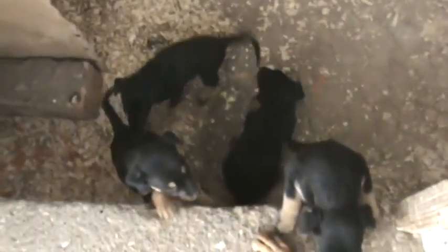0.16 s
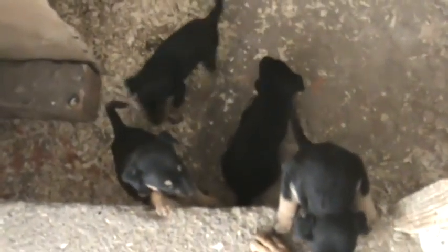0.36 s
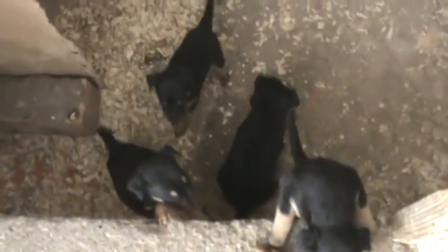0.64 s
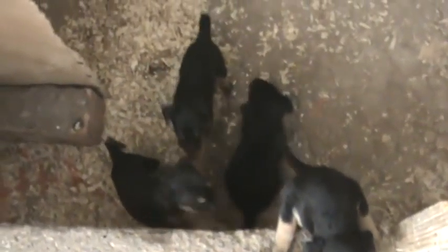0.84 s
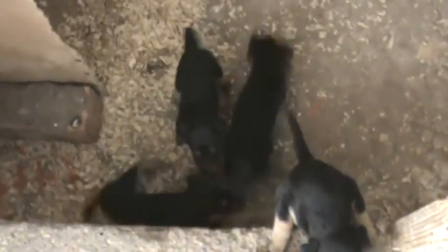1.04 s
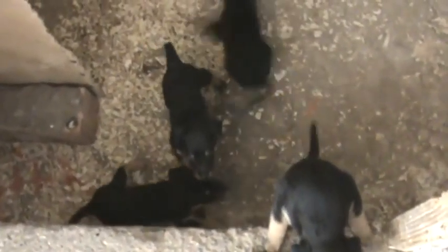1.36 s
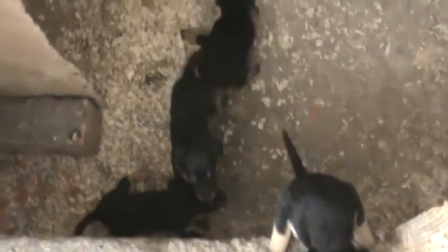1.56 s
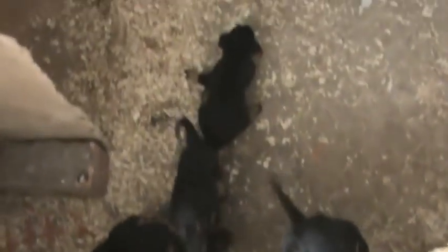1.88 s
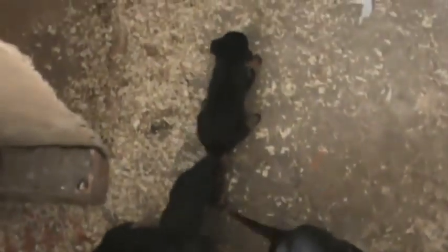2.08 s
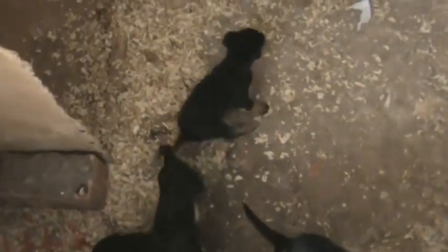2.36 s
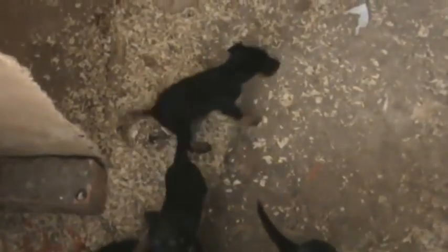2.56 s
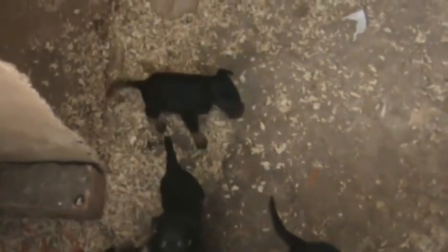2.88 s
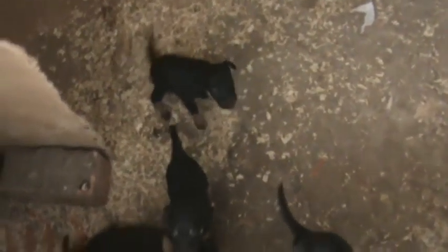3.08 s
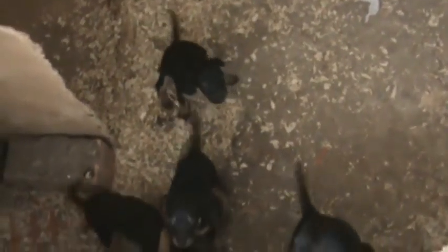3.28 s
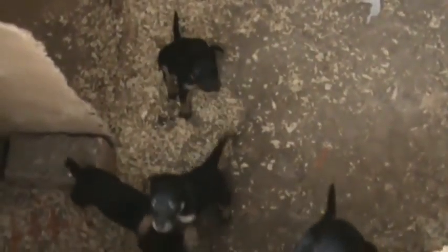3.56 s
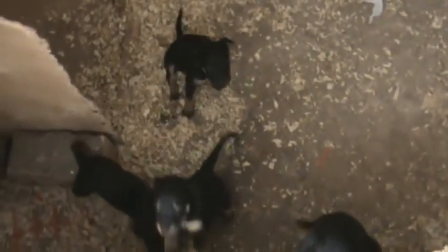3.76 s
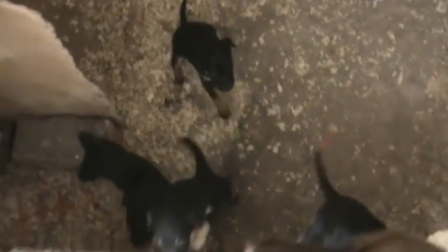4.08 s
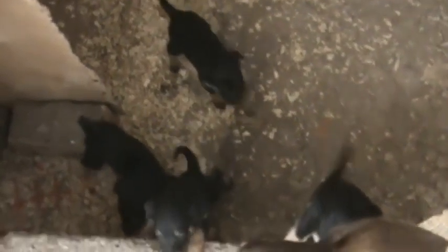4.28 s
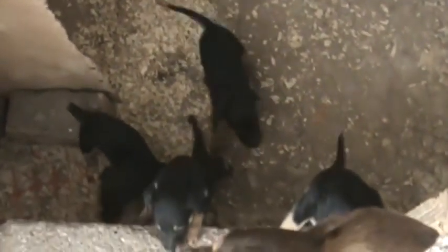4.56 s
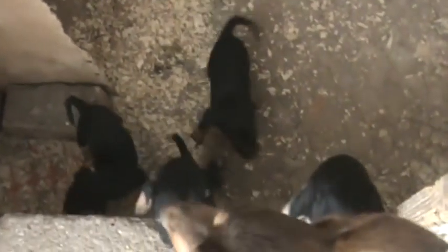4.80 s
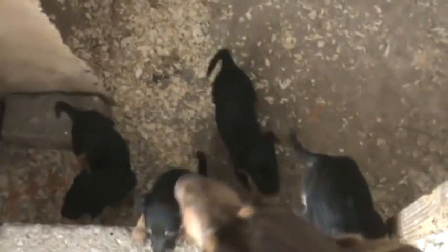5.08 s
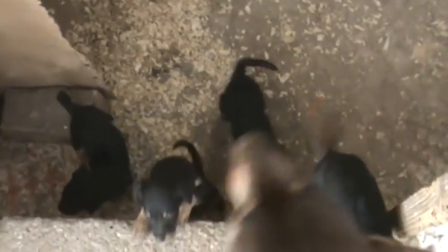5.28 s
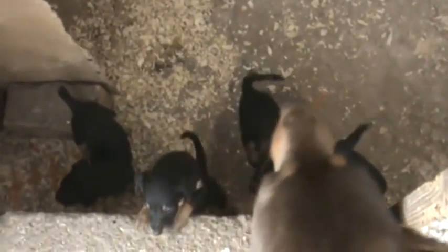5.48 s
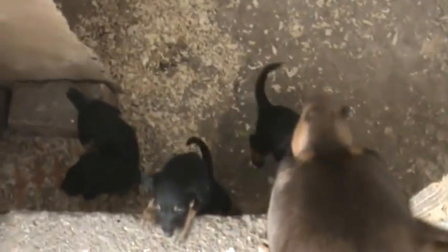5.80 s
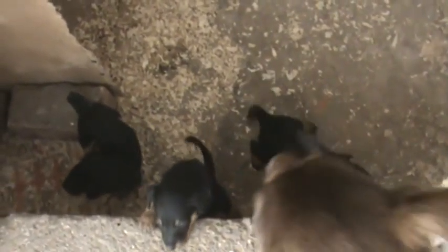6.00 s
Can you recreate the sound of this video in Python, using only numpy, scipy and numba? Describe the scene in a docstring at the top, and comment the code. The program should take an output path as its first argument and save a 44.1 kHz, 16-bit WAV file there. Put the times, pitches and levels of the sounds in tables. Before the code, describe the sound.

Close to a stereo microphone, puppies yelp briefly, smack their lips and grunt while their paws tick on concrete and rustle faintly in wood shavings. Midway the crying peaks with a piercing yelp and a strained, high wail, trailed by a wavering, falling whine. The puppies then settle into tiny whimpers and soft grunts. The pen has a short echo and quiet air with a faint low hum.

```python
"""Puppies in a concrete pen.

Close under a camera's stereo microphone, puppies yelp, whimper, wail and grunt; strain roughens
their voices. Wet lips smack in between, claws tick, and paws rustle and scuff in wood shavings.
The hard walls ring briefly over quiet air and a low hum. A limiter holds down the loudest cries."""
import sys
import numpy as np
from scipy import signal
from scipy.fft import rfft, irfft, next_fast_len
from scipy.io import wavfile
from scipy.ndimage import uniform_filter1d, minimum_filter1d, map_coordinates
from numba import njit

SR = 44100
rng = np.random.default_rng(int(sys.argv[2]) if len(sys.argv) > 2 else 0)


def log_audio(samples):
    """Write samples as a 16-bit WAV file to the path given in sys.argv[1]."""
    # one column per channel
    frames = np.atleast_2d(samples).T
    # limit to full scale, then quantise
    limited = np.clip(frames, -1, 1)
    pcm = np.round(limited * 32767).astype(np.int16)
    wavfile.write(sys.argv[1], SR, pcm)


N = 270774

# Short cries: open-mouthed yelps, nasal whimpers. Each row: start, rise, hold and fall in seconds,
# first, top and last pitch in Hz before the sag, level in dB, octave and overtones in dB against
# that level, roughness from 0 to 1, left over right in dB.
YELPS = [(0, 0.0014, 0.019, 0.027, 970, 981, 973, -36.5, 0.5, -11, 0.71, 2.5),
         (0.216, 0.053, 0.011, 0.11, 1015, 1418, 976.4, -22.5, 4, -1.5, 0.31, 1.7),
         (0.709, 0.013, 0.022, 0.0137, 567, 797.2, 764, -25.5, -7.5, -13, 0.43, 1),
         (2.348, .1, .048, 0.025, 1358, 2219, 1710, -18, -1.5, -5, 0.4, .7)]
WHIMPERS = [(2.021, 0.07, 0.0098, 0.052, 824.5, 1122, 950, -34, -5.5, -21, 0.33, 1),
            (3.95, 0.095, 0.049, 0.1, 513, 590, 615, -61, -8, -34, 0.11, -2),
            (4.681, .08, .08, 0.18, 528, 498, 517, -59.5, -10, -44.5, 0.31, -1),
            (5.149, 0.011, 0.011, 0.016, 940, 932, 930, -44.5, -13, -19.5, 1, 4)]
# Pitch of the two long cries, a high wail and a softer whine. Each row: time in seconds, pitch in Hz.
WAIL_PITCH = [(2.73, 1695), (2.75, 1663), (2.778, 1732), (2.79, 2082), (2.812, 2210), (2.876, 2111),
              (2.912, 2091), (2.98, 2084), (3.046, 1925), (3.25, 1810), (3.288, 1719), (3.358, 1716),
              (3.42, 1580), (3.5, 1583)]
WHINE_PITCH = [(3.662, 1131), (3.71, 1560), (3.736, 1708), (3.828, 1426), (3.95, 1559), (4.098, 1365),
               (4.184, 1409), (4.298, 1308), (4.4, 1068), (4.432, 792), (4.476, 778), (4.51, 730)]
# Their loudness. Each row: time in seconds, relative levels of fundamental and octave in dB.
WAIL_LEVEL = [(2.728, -38, -43), (2.752, -13.5, -24.5), (2.778, -20, -9.5), (2.876, -10.5, -26.5),
              (3.032, -18.5, -30), (3.088, -27.5, -54), (3.104, -18.5, -52.5), (3.264, -42, -50.5),
              (3.378, -36.5, -48), (3.5, -39.5, -58)]
WHINE_LEVEL = [(3.662, -39.5, -50.5), (3.706, -25.5, -29.5), (3.86, -41.5, -55.5), (4.132, -33.5, -54.5),
               (4.154, -50.5, -34.5), (4.238, -33.5, -41.5), (4.354, -44.5, -48), (4.37, -34.5, -48.5),
               (4.51, -36.5, -70)]
# Colours of the voice. Each row: frequency in Hz, gain in dB.
OPEN_MOUTH = [(1500, 17), (2400, 8), (2850, -20), (3350, -15), (4200, 1), (4750, 1.5), (5600, 3.5),
              (6300, -4), (7100, -8.5), (8000, -13.5), (10500, -27.5), (15000, -44.5)]
NOSE = [(1500, 7), (2400, -6.5), (3300, -6), (4200, 0.5), (5000, 0), (6400, 6.5), (7200, 6), (8300, -4),
        (10500, -18.5), (12000, -44), (15000, -25)]  # mouth nearly shut
SHRILL_THROAT = [(3300, -11), (4700, -0.5), (5200, -3), (5800, -2), (6500, 8), (7100, 1), (7700, -14),
                 (9000, -11.5), (10500, -24), (11200, -16.5), (12100, -16), (12700, -34.5), (15000, -44)]  # the wail, with one sharp resonance
LOW_FORMANTS = [(500, -2.5), (800, -1.5), (950, -3.5), (1150, -15), (1400, -11.5), (1700, 2), (2250, 0),
                (2800, -3), (3000, -24.5), (3400, -7.5), (3750, -9.5), (4200, -1), (4600, -8.5)]  # the throat, on a short cry's two lowest harmonics
MUZZLE = [(150, -16), (300, -2.5), (450, -9), (660, -2.5), (850, -3.5), (1050, -4.5), (1300, -10.5),
          (1750, -3), (2400, -23), (3100, -22), (4300, -9), (8000, -47)]  # closed, for grunts
# Grunts. Each row: start in seconds, level in dB, length in seconds, pitch in Hz.
GRUNTS = [(.89, -54.5, 0.084, 433), (1.079, -42, 0.045, 300.5), (1.353, -29, .11, 327.2),
          (2.105, -42, .07, 320.2), (4.474, -47, 0.065, 422.5), (4.903, -46, 0.045, 273.6),
          (5.618, -48.5, 0.048, 247.3), (5.832, -47.5, 0.022, 352), (6.035, -51.5, 0.03, 313)]
# Wet smacks. Each row: start in seconds, level in dB, length in seconds, first flutter rate in Hz,
# first mouth resonance in Hz, last frequency of both in Hz, fade in dB, jitter from 0 to 1.
SMACKS = [(1.027, -28, .025, 2423, 2700, 1820, -2.5, 0.07), (1.05, -33.5, 0.037, 1713, 1799, 585, 2, 0.37),
          (1.221, -25, .023, 1680, 3750, 1077, -6.5, .28), (1.52, -36.5, 0.019, 1382, 1512, 843, 10, .11),
          (1.546, -30, 0.014, 855, 1350, 554, -1, .4), (1.999, -39.5, .022, 1391, 2840, 860, -8, 0.26),
          (2.268, -25.5, .025, 970, 2480, 759, -11, .31), (2.559, -29.5, 0.03, 1304, 1603, 603, -5.5, .4),
          (2.845, -39, 0.032, 1092, 1400, 546, -1.5, 0.39)]
# Claws on the floor. Each row: start in seconds, level in dB.
TICKS = [(1.075, -25.5), (1.542, -27.5), (1.5524, -24), (1.6374, -56), (2.6969, -30.5), (2.787, -40),
         (2.828, -30), (3.576, -45), (4.4327, -36), (4.9955, -49.5), (5.1018, -46)]
# Paws shuffling through the shavings. Each row: start and length in seconds, level in dB.
SHUFFLES = [(0, 0.12, -58), (0.531, 0.044, -53), (1.291, 0.26, -45.5), (1.877, 0.52, -59),
            (2.468, .4, -53.5)]
# The steady rustle under them. Each row: time in seconds, level in dB.
RUSTLE_LEVEL = [(0, -61), (3.3, -56.5), (3.7, -65.5), (4.1, -59.5), (4.649, -63), (5.7, -73), (6.14, -67.5)]
# Soft scuffs. Each row: start and length in seconds, level in dB, first and last centre in Hz.
SCUFFS = [(0.893, 0.38, -64, 4500, 3900), (5.13, 0.43, -63.5, 4870, 3600), (5.863, 0.22, -65, 5700, 4350)]
# Colours of the noisy sounds. Each row: frequency in Hz, relative spectral density in dB.
RASP_COLOUR = [(250, -29), (450, 13), (700, -5.5), (1000, -5), (1300, -45.5), (1750, 2.5), (2900, -4.5),
               (4300, -16.5), (7000, -4), (15500, -26)]
LIP_COLOUR = [(170, -47.5), (300, -5.5), (853, -7.5), (2590, -6.5), (3160, -16), (3550, -4.5),
              (3920, -18.5), (4550, -10.5), (7370, -11), (11700, -18.5), (15800, -35.5)]
CLAW_COLOUR = [(70, -45.5), (140, -24), (400, -17.5), (900, 7.5), (3000, -4.5), (7000, -8.5), (11000, -16),
               (16000, -24)]
SHAVINGS_COLOUR = [(200, 0.5), (500, -13), (1600, 5), (3300, 0.5), (7400, 2), (11000, -3.5), (15800, -16)]
AIR_COLOUR = [(20, -15), (48, -8), (90, -14.5), (280, -13.5), (500, -15.5), (1100, -21.5), (1600, -19),
              (2200, -27.5), (3800, -24.5), (8000, -34), (15800, -37.5)]
# Low hum. Each row: frequency in Hz, level in dB.
HUM = [(43.1, -59)]
# Ring of the pen. Each row: frequency in Hz, seconds to die away by 60 dB.
PEN_T60 = [(200, 0.72), (800, 0.31), (2000, 0.33), (5000, 0.29), (9000, 0.33), (15000, 0.09)]
# Width at the microphone's two ports. Each row: frequency in Hz, difference over sum in dB.
PORT_WIDTH = [(50, -17.5), (150, -16), (500, -3), (1200, -4.5), (2100, -8.5), (3500, -9.5), (8000, -14.5),
              (13000, -6.5)]

TOP_HZ = 15950
TIRED_ROUGH = .44  # roughness gained as a cry ends


def cries():
    """The puppies' voices from down in the pen: yelps, whimpers, a wail and a whine."""
    yelps = sum(short_cry(row, OPEN_MOUTH) for row in YELPS)
    whimpers = sum(short_cry(row, NOSE) for row in WHIMPERS)
    wail = long_cry(WAIL_PITCH, WAIL_LEVEL, SHRILL_THROAT, db=1, octave_db=1, overtone_db=-49,
                    strain_s=.078, strain_db=26, drop=.17, left_db=-.7)
    whine = long_cry(WHINE_PITCH, WHINE_LEVEL, NOSE, db=-1, octave_db=-5.5, overtone_db=-54.5,
                     strain_s=.11, strain_db=10.5, drop=.051, left_db=1.2)
    return low_cut(yelps + whimpers + wail + whine, 400)


def short_cry(row, throat, swell_s=.02, swell_db=9.5, fade_db=7.5, drop_share=.3, sag=.13):
    """One arch of pitch: the voice is cleanest at the top and dulls as the breath runs out."""
    start, rise, hold, fall, first_hz, top_hz, last_hz, db, octave_db, overtone_db, rough, left_db = row
    length = rise + hold + fall
    t = np.arange(int(length * SR)) / SR
    fallen = np.maximum(t - rise - hold, 0) / fall
    rising = first_hz + (top_hz - first_hz) * np.sin(np.pi / 2 * t / rise)
    falling = last_hz + (top_hz - last_hz) * np.exp(-(fallen / drop_share) ** 2)
    pitch = np.where(t < rise, rising, falling) * (1 - sag * fallen)
    slack_octaves = np.abs(np.log2(top_hz / pitch))
    # a cry at time zero is already under way
    level = db - swell_db * np.maximum(1 - t / swell_s, 0) * (start > 0) - fade_db * fallen
    fundamental = level + along(LOW_FORMANTS, pitch)
    octave = level + octave_db + along(LOW_FORMANTS, 2 * pitch)
    overtones = level + overtone_db - 2 * slack_octaves - 6.5 * t / length
    rough = rough + .65 * slack_octaves + TIRED_ROUGH * fallen
    wavering = pitch * (1 + .016 * wobble(70, len(t)))
    return vocal_folds(start + t, wavering, fundamental, octave, overtones, rough, throat, left_db)


def long_cry(pitches, levels, throat, db, octave_db, overtone_db, strain_s, strain_db, drop, left_db,
             relax_s=.004, catch_s=.028, break_hz=1392):
    """A strained, bright start relaxes into a clear tone, which breaks up wherever it sinks low."""
    t = np.arange(pitches[0][0] - .003, pitches[-1][0] + .005, 1 / SR)
    times, *columns = np.transpose(levels)
    level, octave = [np.interp(t, times, column) for column in columns]
    catch = np.clip(2 - 2 * (t[-1] - t) / catch_s, 0, 1)  # the pitch gives way at the last moment
    pitch = np.interp(t, *np.transpose(pitches)) * (1 - drop * catch)
    strain = (1 - np.tanh((t - t[0] - strain_s) / (2 * relax_s))) / 2
    opening = strain * np.minimum((t - t[0]) / (.43 * strain_s), 1)
    # below the break the voice roughens, its octave grows and the higher overtones fade
    octaves_below = np.maximum(np.log2(break_hz / pitch), 0)
    rough = .074 + .34 * strain + octaves_below + TIRED_ROUGH * catch
    octave = octave + octave_db + 28.5 * octaves_below * (1 - strain)
    overtones = overtone_db + .34 * (level - level.mean()) + strain_db * opening
    overtones -= 8.5 * (octaves_below + catch)
    return vocal_folds(t, pitch, level + db, octave, overtones, rough, throat, left_db)


def vocal_folds(t, pitch, fundamental_db, octave_db, overtone_db, rough, throat, left_db, blur_hz=3600):
    """Vocal folds make a stack of harmonics; under strain their cycles grow uneven."""
    n = len(t)
    rough = np.clip(rough, 0, 1)
    jitter = .002 * wobble(45, n) + .028 * rough * wobble(170, n) + .05 * rough ** 2 * wobble(600, n)
    pitch = uniform_filter1d(pitch, 250) * (1 + jitter)
    phase = 2 * np.pi * np.cumsum(pitch) / SR
    k = np.arange(3, 15)[:, None]
    gains = amp(along(throat, k * pitch)) * (k * pitch < TOP_HZ)
    # roughness dissolves the high overtones into breath, which escapes in a puff once a cycle
    overtones = np.sum(gains / (1 + (rough * k * pitch / blur_hz) ** 4) * np.sin(k * phase), 0)
    breath = filtered(noise(throat, n),
                      lambda hz: hz ** 3 / (hz ** 3 + 1500 ** 3) / (1 + (hz / 9000) ** 4))
    overtones += .65 * rough ** 1.5 * np.linalg.norm(gains, axis=0) * breath * (1 + np.cos(phase))
    voice = amp(fundamental_db) * np.sin(phase) + amp(octave_db) * np.sin(2 * phase)
    voice += amp(overtone_db) * overtones
    gate = np.clip((t - t[0]) / .003, 0, 1) * np.clip((t[-1] - t) / .012, 0, 1)
    shimmer = amp(3 * rough * wobble(350, n))
    pan = amp([[left_db / 2], [-left_db / 2]])
    out = np.zeros((2, N))
    add(out, t[0], np.sqrt(2) * voice * gate * shimmer * pan)
    return out


def smacks():
    """Wet lips flutter ever slower as they part, and the opening mouth rings ever lower."""
    out = np.zeros(N)
    for start, db, length, first_hz, small_hz, wide_hz, fade_db, jitter in SMACKS:
        n = int(length * SR)
        u = np.arange(n + 300) / n
        flutter_hz = first_hz * (wide_hz / first_hz) ** u * np.exp(jitter * wobble(900, len(u)))
        pulses = np.diff(np.floor(np.cumsum(flutter_hz) / SR), prepend=-1) * (u < 1)
        pulses *= amp(fade_db * u + 8.63 * jitter * wobble(1500, len(u)))
        # the bright squeak gives way to the hollow ring as the gap widens
        squeak = unit(struck(scattered(pulses, t60=.0051), LIP_COLOUR)) * amp(-5 * u)
        mouth_hz = small_hz * (wide_hz / small_hz) ** u
        ring = unit(resonance(pulses, mouth_hz, width_hz=250))
        add(out, start, amp(db - 3.5) * (squeak + (.2 + .65 * u) * ring))
    return out


def grunts(half_rasp_db=-26):
    """Low uneven pulses in a closed muzzle sag in pitch; loud ones rasp, soft ones are duller."""
    out = np.zeros(N)
    for start, db, length, pitch_hz in GRUNTS:
        n = int(length * SR)
        u = np.arange(n) / n
        rasp_db = .98 * (db - half_rasp_db)
        tilt_db_per_octave = min(rasp_db, 0) / 4
        cycles = np.cumsum(pitch_hz * (1 + .08 * (.5 - u) + .06 * wobble(200, n))) / SR
        tone = unit(sum(amp(along(MUZZLE, k * pitch_hz) + tilt_db_per_octave * np.log2(k))
                        * np.sin(2 * np.pi * (k * cycles + rng.random())) for k in range(1, 20)))
        rasp = unit(noise(RASP_COLOUR, n) * (1 + 1.4 * np.cos(2 * np.pi * cycles)))
        swell = np.sin(np.pi * u ** .75)
        shimmer = amp(2 * wobble(200, n))
        add(out, start, amp(db - 2) * swell * (tone * shimmer + amp(rasp_db) * swell * rasp))
    return low_cut(out, 190)


def paws(snaps_per_s=24, tick_t60=.016):
    """Claws tick on concrete over a grainy rustle that swells with each shuffle; single shavings snap."""
    stir = amp(np.interp(np.arange(N) / SR, *np.transpose(RUSTLE_LEVEL)))
    for start, length, db in SHUFFLES:
        u = np.linspace(0, 1, int(length * SR))
        add(stir, start, amp(db) * np.sin(np.pi * np.sqrt(u)) ** 2)
    rustle = unit(noise(SHAVINGS_COLOUR, N) * amp(.93 * wobble(22.85, N) + 1.6 * wobble(490, N)))
    pulses = (rng.random(N) < snaps_per_s / SR) * amp(3 * rng.standard_normal(N))
    snaps = unit(struck(scattered(pulses, t60=.031), SHAVINGS_COLOUR))
    out = rustle * stir + amp(-79.5) * snaps
    t = np.arange(SR // 12) / SR
    for start, db in TICKS:
        add(out, start, amp(db) * noise(CLAW_COLOUR, len(t)) * amp(-60 * t / tick_t60))
    return out


def scuffs(width_hz=1800):
    """A paw scuffs the floor: a narrow hiss that swells quickly and sinks as it fades."""
    out = np.zeros(N)
    for start, length, db, first_hz, last_hz in SCUFFS:
        n = int(length * SR)
        u = np.arange(n) / n
        centre_hz = first_hz + (last_hz - first_hz) * u
        band = resonance(rng.standard_normal(n), centre_hz, width_hz)
        hiss = unit(resonance(band, centre_hz, width_hz))
        add(out, start, amp(db) * hiss * np.sin(np.pi * np.sqrt(u)))
    return out


def scattered(x, t60):
    """Surfaces right beside the source smear each pulse over a moment."""
    t = np.arange(SR // 100) / SR
    smear = unit(rng.standard_normal(len(t)) * amp(-60 * t / t60))
    return np.convolve(x, smear + 12 * (t == 0))[:len(x)]


def walls(x, width=.07):
    """The concrete walls answer after 5 ms, nearly alike on both sides of the microphone."""
    hz, t, spectra = signal.stft(rng.standard_normal((2, SR // 2)), SR, nperseg=256)
    decay = amp(-60 * t / along(PEN_T60, hz)[:, None])
    mid, side = signal.istft(spectra * decay, SR, nperseg=256)[1]
    tail = np.array([mid + width * side, mid - width * side]) / np.linalg.norm(mid)
    return signal.fftconvolve(np.pad(x, (220, 0))[None], tail, axes=1)[:, :N]


def ambience(air_db=-61.5):
    """Quiet air around the pen, wider in the treble, and a low wavering hum."""
    side = filtered(noise(AIR_COLOUR, N), lambda hz: np.interp(hz, [1000, 12000], [.2, .8]))
    air = noise(AIR_COLOUR, N) + np.array([[1], [-1]]) * side
    t = np.arange(N) / SR
    hum = sum(amp(db + 1.1 * wobble(5, N)) * np.sin(2 * np.pi * hz * t + 1.3 * wobble(38, N))
              for hz, db in HUM)
    return amp(air_db + 1.2 * wobble(4.2, N)) * air + hum


def microphone_ports(x):
    """Two close ports hear nearly the same sound with a shift of phase between them."""
    sides = np.array([[1], [-1]])
    return filtered(x, lambda hz: np.exp(1j * np.arctan(amp(along(PORT_WIDTH, hz))) * sides))


def amp(db):
    """Decibels to gain."""
    return 10 ** (np.asarray(db) / 20)


def unit(x):
    """x at rms 1."""
    return x / np.sqrt(np.mean(x ** 2) + 1e-20)


def along(points, hz):
    """(Hz, value) points read on a log axis."""
    knots_hz, values = np.transpose(points)
    return np.interp(np.log(hz + 1), np.log(knots_hz), values)


def wobble(rate, n):
    """A smooth random curve of n samples, rate knots a second."""
    return map_coordinates(rng.standard_normal(int(n * rate / SR) + 4), [np.arange(n) * rate / SR])


def filtered(x, response):
    """x through a gain given as a function of frequency."""
    n = x.shape[-1]
    size = next_fast_len(n + 8192)
    return irfft(rfft(x, size) * response(np.fft.rfftfreq(size, 1 / SR)), size)[..., :n]


def low_cut(x, corner_hz):
    """A steep bass roll-off."""
    return filtered(x, lambda hz: hz ** 6 / (hz ** 6 + corner_hz ** 6))


def noise(spectrum, n):
    """Coloured noise of rms 1."""
    return unit(filtered(rng.standard_normal(n), lambda hz: amp(along(spectrum, hz))))


def struck(x, spectrum, size=512):
    """x through a minimum-phase colour, so that pulses keep their sharp fronts."""
    cepstrum = irfft(np.log(amp(along(spectrum, np.fft.rfftfreq(size, 1 / SR)))))
    cepstrum[1:size // 2] *= 2
    cepstrum[size // 2 + 1:] = 0
    return np.convolve(x, irfft(np.exp(rfft(cepstrum))))[:len(x)]


@njit
def resonance(x, centre_hz, width_hz):
    """A resonance whose centre moves with each sample."""
    pole = np.exp(np.pi * (2j * centre_hz - width_hz) / SR)
    y, state = np.zeros(len(x)), 0j
    for i in range(len(x)):
        state = state * pole[i] + x[i]
        y[i] = state.real
    return y


def add(track, start, x):
    """Mix x into the track from start, in seconds."""
    i = max(round(start * SR), 0)
    track[..., i:i + x.shape[-1]] += x[..., :max(N - i, 0)]


def scene():
    """Cries come from down in the pen; smacks, grunts and paws are nearer, drier and a little left."""
    voices = cries()
    near = smacks() + grunts() + paws() + scuffs()
    echo = walls(amp(-5) * voices.mean(0) + amp(-10.5) * near)
    return voices + near * amp([[1.3], [-1.3]]) + echo + ambience()


def record(dry, ceiling=.52):
    """Behind the microphone a limiter ducks at once and holds briefly; the extreme treble is cut."""
    heard = microphone_ports(dry)
    needed = np.minimum(1, ceiling / (np.abs(heard).max(0) + 1e-9))
    hold = SR // 25
    held = minimum_filter1d(needed, hold, origin=hold // 2 - 200)  # looks 200 samples ahead
    gain = uniform_filter1d(held, size=300)
    return filtered(heard * gain, lambda hz: hz < TOP_HZ)


dry = scene()
out = record(dry)
log_audio(out)
```